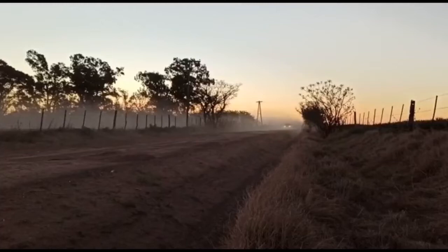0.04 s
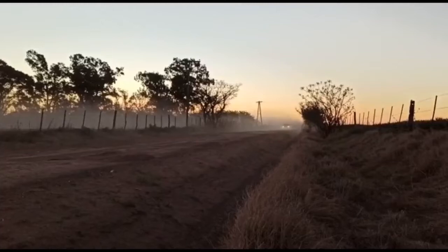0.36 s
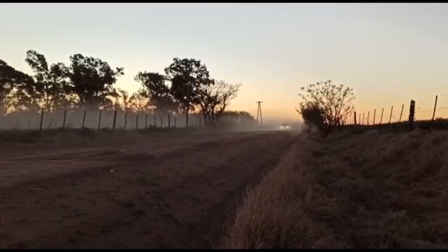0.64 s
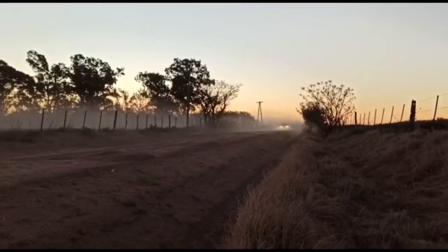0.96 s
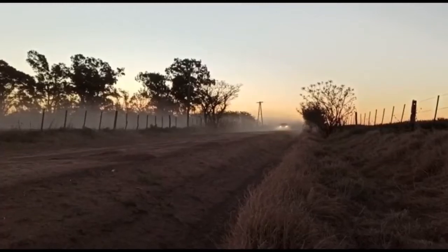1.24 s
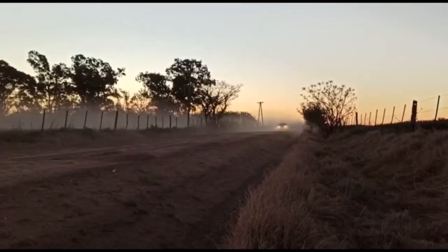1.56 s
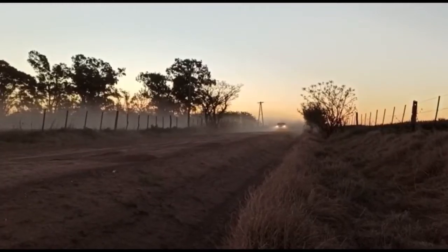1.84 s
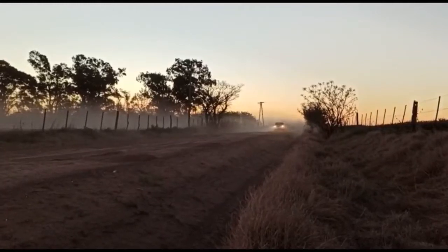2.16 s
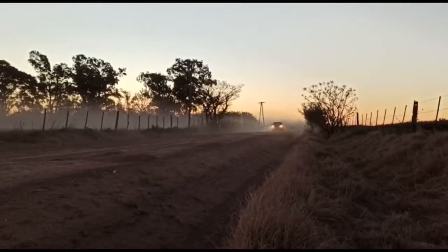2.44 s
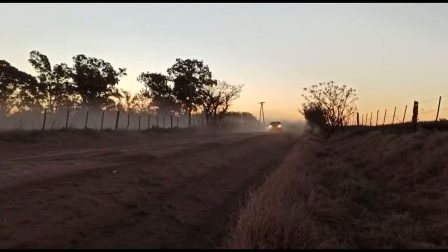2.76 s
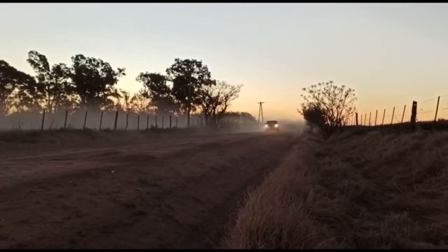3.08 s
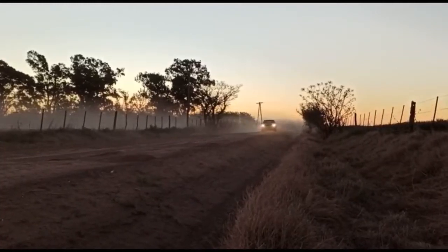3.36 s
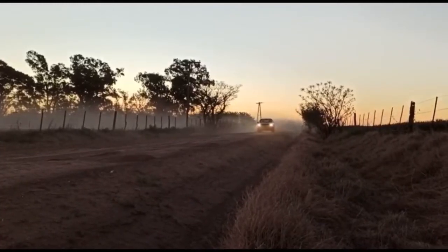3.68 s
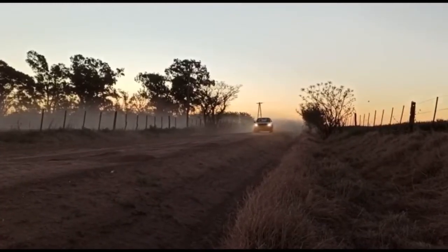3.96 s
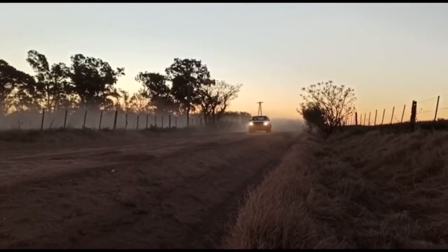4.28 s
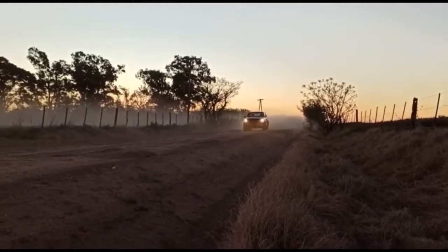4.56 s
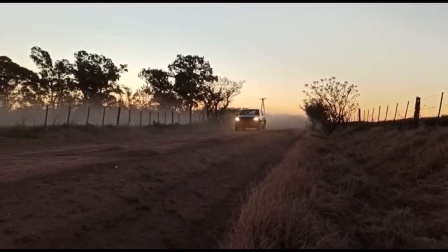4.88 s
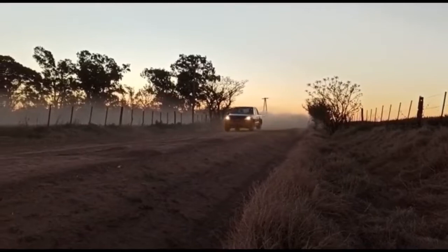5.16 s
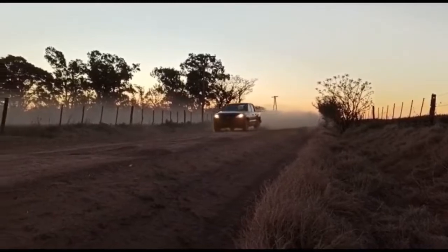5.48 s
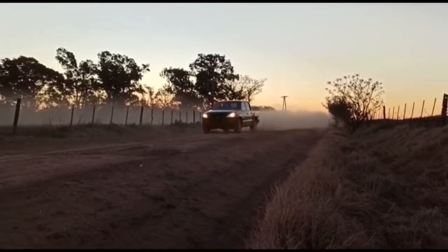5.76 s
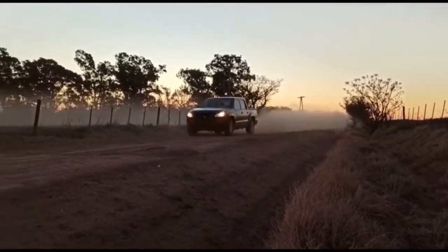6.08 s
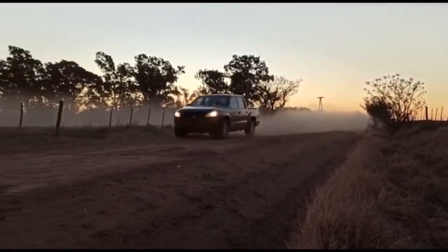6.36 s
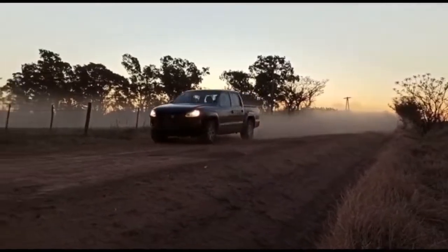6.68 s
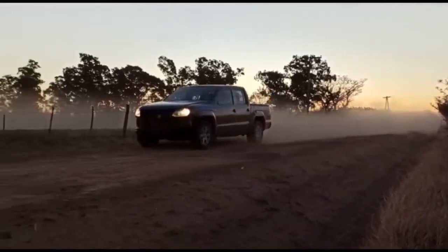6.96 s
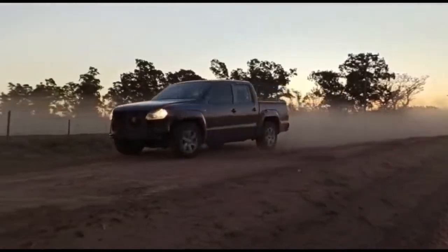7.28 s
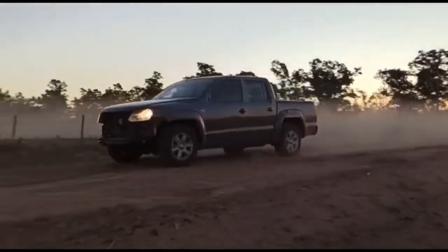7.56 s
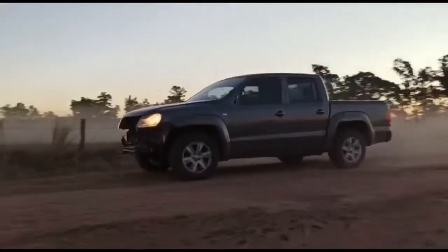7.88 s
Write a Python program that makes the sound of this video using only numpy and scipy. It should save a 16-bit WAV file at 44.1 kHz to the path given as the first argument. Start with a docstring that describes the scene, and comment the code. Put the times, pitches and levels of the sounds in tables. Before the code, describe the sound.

A pickup truck's engine hums in the distance on a dirt road, sinking slowly in pitch over the first four seconds. Dry grass rustles faintly, a cricket chirps softly, and a bird whistles three falling notes between about 1.2 and 2.5 seconds. A faint drivetrain whine sits underneath. From 3 seconds the tyres roar and scrub more loudly on the dirt, with occasional clicks of flicked stones. At about 4.6 seconds the engine revs up once, loudest near 5 seconds, then drops away, burbling and popping until about 6 seconds. A low, throbbing exhaust drone takes over and swells as the truck comes close. From 6.5 seconds a high, whistling hiss rises, along with spraying grit and fine spurts of sand. The sound shifts slightly from left to right, and the drone is still growing as the truck slides past at 8 seconds.

```python
"""A pickup's engine comes up a dirt road at dusk: eight firings a cycle sink in pitch, get one blip of
throttle, then burble and pop on the overrun. A throbbing drone booms through the exhaust pipe and swells
as the truck slides past. Its tyres roar on the dirt and spray grit, stones and sand, and a high,
whistling hiss rises close by. Behind it the dry grass rustles, a cricket chirps and a bird whistles
three times."""
import sys
import numpy as np
from scipy import signal
from scipy.fft import rfft, irfft, next_fast_len
from scipy.io import wavfile
from scipy.ndimage import map_coordinates

SR = 44100
rng = np.random.default_rng(int(sys.argv[2]) if len(sys.argv) > 2 else 0)


def store_wav(level_fs):
    """Save 16-bit WAV to argv[1]."""
    pcm = np.round(np.clip(np.atleast_2d(level_fs), -1, 1) * 32767)
    wavfile.write(sys.argv[1], SR, pcm.T.astype(np.int16))


N = 354123
TIME = np.arange(N) / SR
FFT_SIZE = next_fast_len(N)
BINS = np.maximum(np.arange(FFT_SIZE // 2 + 1) * SR / FFT_SIZE, 1)

# Engine revs. Each row: time in seconds, four-stroke cycles per second.
REVS = [(0.08, 27), (0.5, 25.3), (1.15, 23.4), (1.6, 22.7), (2.0, 20.3), (2.5, 20.4), (3.2, 18.8),
        (3.8, 18.4), (4.4, 14.8), (4.64, 14.8), (4.76, 15.4), (4.86, 18.3), (4.96, 22.8), (5.05, 24.1),
        (5.13, 24.6), (5.25, 23.4), (5.35, 21.8), (5.58, 18.8), (5.7, 16.8), (6.1, 13.4)]
# Overtones of the uneven cylinders. Each row: multiple of the cycle rate, then its gain in dB
# when cruising, at open throttle and on the overrun.
ENGINE_ORDERS = [(4, -9, -19.5, -0.5), (5, -4, 0, 1.5), (9, -5, -4, 7), (10, -7.5, -15, -6.5),
                 (11, -4.5, -0.5, -2), (12, -4, -9, -2.5), (13, -1, -1, -6.5), (14, -5, -7.5, -3),
                 (15, -7, -14, -6.5), (16, -6, -2.5, -7.5), (17, -8, -8, -3), (18, -10, -6.5, -5.5),
                 (21, -10.5, -5, -3), (22, -13.5, -7, -6), (23, -10.5, -5, -14), (24, -12.5, -5.5, -13),
                 (26, -12.5, -5.5, -15.5)]
# Boom at certain revs. Each row: cycles per second, gain in dB of the firing note, and of the sixth order.
BOOM_BY_REVS = [(13.4, -18, -18), (14.5, 0.5, -2), (17.2, 2, 6.5), (17.9, 1, -2), (19.86, -5.5, 8.5),
                (20.47, -5.5, -3), (25.23, 5, -17), (25.84, 0, -18), (27.2, -7.5, -18)]
# Tailpipe colour on the overtones. Each row: frequency in Hz, gain in dB.
TAILPIPE_EQ = [(45, -35), (75, -7.5), (110, 3), (150, -3), (200, 2), (270, 0), (370, 1.5), (440, -8.5),
               (560, -4), (700, -10)]
# Exhaust faders. Each row: time in seconds, base level of engine and burble in dB, rumble level in dB.
EXHAUST_LEVELS = [(0.08, -40.5, -52.5), (0.35, -42, -48), (1.8, -39.5, -52), (2.4, -40, -41),
                  (2.75, -40.5, -46), (3.3, -38, -37.5), (4.2, -38, -46), (4.52, -36, -42),
                  (4.74, -28.5, -47), (4.92, -20.5, -42), (5.08, -23, -35.5), (5.27, -29, -39),
                  (5.42, -27.5, -38.5), (5.75, -26.5, -39), (5.9, -29.5, -40), (6.7, -33.5, -42),
                  (7.25, -30.5, -49), (7.7, -32.5, -39), (8.03, -25, -33)]
# Colours of the gas puffs and the low rumble. Each row: frequency in Hz, relative density in dB.
BURBLE_EQ = [(55, -8.5), (85, -3.5), (120, 8), (160, 8), (200, 9.5), (235, 5.5), (275, 6.5), (320, 1.5),
             (365, 3.5), (430, -5), (560, -12.5), (800, -40.5)]
RUMBLE_EQ = [(20, -14), (50, -19.5), (62, -15.5), (75, 4), (92, 10.5), (120, -1.5), (160, -20.5)]
# The close drone. Each row: time in seconds, pitch of its main note in Hz, drive in dB.
DRONE_PATH = [(5.8, 190.4, -44.5), (6.15, 190, -47), (6.4, 198, -42.5), (6.7, 197, -36.5),
              (6.9, 192.6, -33), (7.1, 188.5, -34), (7.25, 187.3, -30.5), (7.45, 190.4, -28),
              (7.66, 195, -28), (7.8, 200.8, -27), (8.03, 206.1, -25.5)]
# Its partials. Each row: multiple of the throb rate, gain in dB.
DRONE_PARTIALS = [(8, -2.5), (10, -6), (11, 3), (13, 0.5), (15, -7), (16, -5.5), (17, -6), (18, -9.5),
                  (19, 2), (20, -12.5), (21, 0.5), (22, -8), (23, -7), (24, -11.5), (26, -9), (29, -7),
                  (30, -3.5), (31, -9), (32, -8), (34, -9), (35, -11), (39, -13.5), (42, -10)]
# Pipe resonances they slide through. Each row: frequency in Hz, gain in dB.
DRONE_PIPE_EQ = [(70, -8), (98, -11.5), (107, 0.5), (125, -1.5), (145, -6), (170, -1.5), (181, 7.5),
                 (188.5, 14.5), (196, 12), (204, 5), (225, -2.5), (255, -1.5), (280, -1), (295, -7),
                 (340, 1.5), (400, -4.5)]
# Overrun pops and flicked stones. Each row: start in seconds, strength in dB.
POPS = [(4.904, -6), (5.352, -12), (5.362, -15), (5.407, -5), (5.454, -16), (5.664, -23), (5.786, -17)]
STONES = [(0.391, -47), (2.346, -37), (2.407, -35), (3.812, -41), (4.171, -27), (4.302, -27.5),
          (4.702, -22), (5.611, -30), (7.876, -22.5)]
# How each rings. Each row: frequency in Hz, gain in dB, seconds to die away by 60 dB.
POP_MODES = [(124, -10.5, 0.038), (197, -18, 0.019), (358, -7, 0.029), (564, 0, 0.0035),
             (1200, -17.5, 0.011)]
STONE_MODES = [(613, 2.5, 0.029), (800, 0, 0.041), (1110, -2.5, 0.026), (1570, -12, 0.0092),
               (2090, -14.5, 0.0091), (3900, -23, .012)]
# Far drivetrain whine. Each row: time in seconds, pitch in Hz, level in dB.
WHINE_PATH = [(1.5, 775, -65.5), (2.2, 768, -60.5), (3, 755, -57.5), (3.5, 775, -56), (4.4, 770, -59)]
# The truck's approach. Each row: time in seconds, distance in metres.
DISTANCE = [(0, 150), (4, 62), (5, 28), (6, 20.2), (7, 12.7), (8.03, 6.4)]
# Its bearing. Each row: time in seconds, lag of the left side in samples.
LEFT_LAG = [(0, 4), (3, 3.5), (5.7, 2), (6.5, 1.7), (7.25, -0.5), (8, -3)]
# How hard the tyres churn the dirt. Each row: time in seconds, strength in dB.
CHURN = [(0.15, -51), (0.5, -55), (1.6, -57.5), (2.3, -56), (2.8, -51.5), (3.2, -51.5), (3.7, -48.5),
         (4.15, -46.5), (4.32, -42.5), (4.5, -47), (4.9, -38.5), (5.5, -40.5), (6.1, -40.5), (6.45, -42.5),
         (7.0, -41), (7.6, -41), (8.03, -39)]
# Colours of the tyre layers, low to high. Each row: frequency in Hz, relative density in dB.
ROAR_EQ = [(250, 8), (450, 4.5), (560, 2.5), (660, 1.5), (770, 1.5), (950, -6.5), (1300, -28)]
SCRUB_EQ = [(700, -5), (1000, 0), (1150, 2.5), (1400, -2), (1900, -5.5), (2300, -13.5), (2800, -25),
            (4000, -43.5)]
GRIT_EQ = [(2000, 1.5), (2700, -4), (3200, -2.5), (3900, 1.5), (4500, 1), (5000, -7), (5700, -7.5),
           (6500, -2), (8300, -6), (8900, -11)]
DUST_EQ = [(11700, 1), (12300, -5.5), (13300, -3.5), (14300, -1.5), (15700, -4)]
SAND_EQ = [(12300, -15.5), (12900, -1.5), (13400, 1.5), (14000, -8)]
# Spurts of fine sand. Each row: time of the peak in seconds, pitch in Hz, level in dB.
SAND_SPURTS = [(6.32, 13160, -63), (6.78, 13330, -69), (6.94, 13400, -61), (7.28, 13000, -61),
               (7.345, 12770, -54), (7.4, 13120, -50), (7.456, 13400, -48), (7.51, 13100, -50),
               (7.721, 13100, -49), (7.78, 13100, -53), (7.83, 13140, -53)]
# High hiss faders. Each row: time in seconds, hiss level in dB, whistle level in dB.
HISS_LEVELS = [(0, -75, -83), (2.8, -77.5, -79.5), (4, -62, -72), (5, -78, -64), (5.6, -71, -70),
               (6, -63, -60.5), (6.5, -49.5, -53), (6.85, -52.5, -43), (7.22, -46.5, -45),
               (7.6, -43.5, -57.5), (8.03, -49, -52)]
# Colour of that hiss. Each row: frequency in Hz, relative density in dB.
HISS_EQ = [(5900, -13.5), (6300, -3), (6800, 1.5), (7500, 4), (7900, 1), (8600, -10)]
# Bird whistles. Each row: start, length, attack, glide and sinking time in seconds; start pitch,
# knee pitch, sharp drop and final target pitch in Hz; level and fade over the note in dB.
BIRD_NOTES = [(1.17, 0.38, 0.037, .03, 0.083, 4380, 4330, 4, 4180, -70.5, 2),
              (1.658, 0.32, 0.017, 0.104, 0.092, 4380, 5120, 634, 3340, -67, -4.5),
              (2.092, .39, 0.11, 0.064, 0.1, 5920, 5300, 10, 3200, -56, 16)]
# The cricket in the verge. Each row: time in seconds, level in dB.
CRICKET_LEVEL = [(0, -66.5), (2, -71.5), (3.5, -69), (5, -82.5), (8, -83)]
# Colours of the cricket, the grass and the noise floor. Each row: frequency in Hz, relative density in dB.
CRICKET_EQ = [(6200, -8), (6700, -9.5), (7400, 2), (7700, -5.5), (8400, -18.5)]
GRASS_EQ = [(850, 1.5), (1050, 4), (1500, -20), (2300, -9), (2900, -17), (3500, -24.5)]
FLOOR_EQ = [(11700, -3), (13300, 0), (15700, 1.5)]
# Stereo width of the noises. Each row: frequency in Hz, left-right likeness (one is mono).
STEREO_LIKENESS = [(30, 0.91), (80, 0.99), (200, 0.97), (500, 0.97), (1000, 0.86), (2000, 1), (4000, 0.3),
                   (7500, 0.57), (13000, 0.12)]
# Stereo balance. Each row: frequency in Hz, left minus right in dB.
STEREO_BALANCE = [(100, 0), (270, 1.34), (500, 0.6), (1200, -2.5), (2000, -4.5), (3000, 4.5), (4000, -3.5),
                  (5400, 1), (6500, 2.5), (7500, 0.5), (8500, -1), (12000, -2), (14000, -4)]

FIRINGS = 8   # per engine cycle
BLIP_S, BLIP_OPEN_S, BLIP_HOLD_S, BLIP_CLOSE_S = 4.52, 0.14, 0.38, 0.18
OVERRUN_HOLD_S, OVERRUN_EASE_S = 0.23, 0.5
DRONE_ORDER, THROB_PEAK_S = 21, 7.845   # the drone's main note is this multiple of its throb rate
TYPICAL_CHURN_DB, NEAR_M, GRIT_REACH_M = -42, 8.1, 4.7


def engine(cycle_hz, crank, tail_s, fade_s):
    """Eight firings a cycle give the note; unequal cylinders add orders that change with the load."""
    speeds, *booms = np.transpose(BOOM_BY_REVS)
    firing_db, sixth_db = [np.interp(cycle_hz, speeds, db) for db in booms]
    firing_db += exhaust_db(trim_db=-0.3, throttle_db=-4, overrun_db=0)
    sixth_db += exhaust_db(trim_db=-1.5, throttle_db=-21, overrun_db=-7)
    note = from_db(firing_db) * partial(FIRINGS * crank, flutter_db=1.54, flutter_rate=3.7)
    note += from_db(sixth_db) * partial(6 * crank, flutter_db=2.0, flutter_rate=11)
    pulling, braking, overtones = throttle(), overrun(), 0
    for order, cruise_db, open_db, overrun_db in ENGINE_ORDERS:
        db = cruise_db + (open_db - cruise_db) * pulling + (overrun_db - cruise_db) * braking
        db += at_hz(TAILPIPE_EQ, order * cycle_hz)
        overtones += from_db(db) * partial(order * crank, flutter_db=2.0, flutter_rate=6.9)
    overtones *= from_db(exhaust_db(trim_db=-7, throttle_db=1.6, overrun_db=0))
    fade_out = np.clip((REVS[-1][0] + tail_s - TIME) / fade_s, 0, 1)
    return (note + overtones) * fade_out


def throttle():
    """One blip, from zero to one and back: the throttle opens, holds and closes."""
    return np.interp(TIME, BLIP_S + np.cumsum([0, BLIP_OPEN_S, BLIP_HOLD_S, BLIP_CLOSE_S]), [0, 1, 1, 0])


def overrun():
    """One while the closed throttle brakes the engine after the blip, easing off as it slows."""
    closing_s = BLIP_S + BLIP_OPEN_S + BLIP_HOLD_S
    corners_s = closing_s + np.cumsum([0, BLIP_CLOSE_S, OVERRUN_HOLD_S, OVERRUN_EASE_S])
    return np.interp(TIME, corners_s, [0, 1, 1, 0])


def exhaust_db(trim_db, throttle_db, overrun_db):
    """Level of one engine layer: it rides the exhaust fader and shifts with the load."""
    return in_time(EXHAUST_LEVELS)[0] + trim_db + throttle_db * throttle() + overrun_db * overrun()


def drone(waver_per_m, flutter_db_per_m):
    """Orders of one slow throb boom through the pipe, all growing steadier as the truck nears."""
    hz, drive_db = in_time(DRONE_PATH)
    metres, = in_time(DISTANCE)
    throb_hz = hz / DRONE_ORDER
    phase = throb_phase() + phase_of(throb_hz * waver_per_m * metres * drift(12.8))
    tone = 0
    for order, db in DRONE_PARTIALS:
        in_step = DRONE_ORDER - 2 <= order <= DRONE_ORDER   # these three surge together
        offset = 0 if in_step else 2 * np.pi * rng.random()
        pipe_db = at_hz(DRONE_PIPE_EQ, order * throb_hz)
        flutter_db = flutter_db_per_m * metres * drift(6.0)
        tone += from_db(db + pipe_db + flutter_db) * np.cos(order * phase + offset)
    return np.sqrt(2) * from_db(drive_db) * tone * during(DRONE_PATH, fade_s=0.17)


def throb_phase():
    """Phase of the slow throb under the drone, in radians."""
    phase = phase_of(in_time(DRONE_PATH)[0] / DRONE_ORDER)
    return phase - np.interp(THROB_PEAK_S, TIME, phase)


def surges(sharpness):
    """Short surges, two in each cycle of the drone's throb."""
    return (np.cos(throb_phase()) ** 2) ** sharpness * during(DRONE_PATH, fade_s=0.15)


def burble(crank, depth, lump_db, surge_db):
    """Each firing lets out a puff of turbulent gas, some stronger than others."""
    puffs = (1 + depth * np.cos(FIRINGS * crank)) * from_db(lump_db * drift(25))
    db = exhaust_db(trim_db=-1.5, throttle_db=-6, overrun_db=-1.5) + surge_db * surges(sharpness=5)
    return from_db(db) * spread(noise() * puffs, BURBLE_EQ)


def rumble():
    """A bed of deep noise gives the exhaust its weight."""
    return from_db(in_time(EXHAUST_LEVELS)[1]) * spread(noise(), RUMBLE_EQ)


def knocks(events, modes, trim_db):
    """Each pop or stone rings every mode with a strength of its own; little bass is radiated."""
    starts = [round(s * SR) for s, _ in events]
    strength_db = np.array(events)[:, 1] + trim_db
    ringing = np.zeros(N)
    for k, (hz, db, t60) in enumerate(modes):
        clicks = np.zeros(N)
        clicks[starts] = (-1) ** k * from_db(strength_db + db + rng.normal(0, 4.2, len(starts)))
        ringing += ring(clicks, hz, t60)
    return signal.sosfilt(signal.butter(4, 90, "high", fs=SR, output="sos"), ringing)


def gear_whine(waver):
    """A thin, unsteady tone from the far drivetrain."""
    hz, db = in_time(WHINE_PATH)
    tone = partial(phase_of(hz * (1 + waver * drift(20.5))), flutter_db=1.5, flutter_rate=12)
    return from_db(db) * during(WHINE_PATH, fade_s=0.19) * tone


def tyres():
    """Treads roar on packed earth, scrub over loose soil and throw grit and fine dust."""
    ruts = drift(25)   # shake all layers together
    churn_db = in_time(CHURN)[0] - TYPICAL_CHURN_DB

    def fader(far_db, follow, close_db, shake_db, reach_m=GRIT_REACH_M):
        """A layer follows the churn and gains about close_db as the truck comes near."""
        return from_db(far_db + follow * churn_db + close_db * closeness(reach_m) + shake_db * ruts)

    roar = spread(grains(per_s=550, size_db=2.5, share=0.46), ROAR_EQ)
    roar *= fader(far_db=-37.5, follow=0.62, close_db=1.9, shake_db=0.9)
    scrub = spread(grains(per_s=900, size_db=4.5, share=0.37), SCRUB_EQ)
    scrub *= fader(far_db=-43, follow=1.02, close_db=0, shake_db=0.65)
    grit = spread(grains(per_s=2500, size_db=0.5, share=0.48), GRIT_EQ)
    grit *= fader(far_db=-54.5, follow=0.94, close_db=6.5, shake_db=0.84)
    dust = spread(grains(per_s=5000, size_db=6.5, share=0.3), DUST_EQ)
    dust *= fader(far_db=-75.5, follow=0.76, close_db=16.7, shake_db=0.6, reach_m=14)
    return roar + scrub + grit + dust


def closeness(reach_m):
    """Flying soil is heard only over the last metres: one at NEAR_M, dying away with distance."""
    return np.exp(-(in_time(DISTANCE)[0] - NEAR_M) / reach_m)


def sand(sizzle_db, flicker_db, spurt_s, width_hz):
    """Sand sizzles off the sliding tyres, with quick spurts that each have their own pitch."""
    sizzle_gain = from_db(sizzle_db + flicker_db * drift(25)) * closeness(reach_m=7)
    sizzle = spread(grains(per_s=900, size_db=0.5, share=0.5), SAND_EQ)
    spurts = sum(from_db(db) * swell(s, spurt_s) for s, _, db in SAND_SPURTS)
    return sizzle_gain * sizzle + spurts * narrow_noise(in_time(SAND_SPURTS)[0], width_hz)


def high_hiss(pitch_hz, sag_hz, width_hz, frayed_hz, flicker_db, tick_db):
    """A breathy whistle, like air through a turbo, in a wider hiss; both tick with the throb."""
    hiss_db, whistle_db = in_time(HISS_LEVELS)
    sag = swell(at_s=7.15, width_s=0.31)   # the pitch dips once and frays
    centre_hz = pitch_hz - sag_hz * sag
    focused = np.sqrt(1 - sag) * narrow_noise(centre_hz, width_hz)
    frayed = np.sqrt(sag) * narrow_noise(centre_hz, frayed_hz)
    whistle = from_db(whistle_db) * spread(focused + frayed, HISS_EQ)
    hiss = from_db(hiss_db) * spread(grains(per_s=530, size_db=1.5, share=0.32), HISS_EQ)
    return from_db(flicker_db * drift(11) + tick_db * surges(sharpness=60)) * (whistle + hiss)


def bird(waver, echo_db, echo_s, drop_s=0.011, release_s=0.04, edge_db=-25):
    """Pure whistles glide to a knee, may drop sharply, then sink; the trees give one faint echo."""
    song = np.zeros(N)
    for start, length, attack, glide, sink, start_hz, knee_hz, drop_hz, end_hz, db, fade_db in BIRD_NOTES:
        t = TIME - start
        past_knee = np.maximum(t - glide, 0)
        glide_hz = np.interp(t, [0, glide], [start_hz, knee_hz])
        hz = end_hz + (glide_hz - drop_hz - end_hz) * np.exp(-past_knee / sink)
        hz += drop_hz * np.exp(-past_knee / drop_s)
        corners_s = [0, attack, length - release_s, length]
        shape_db = np.interp(t, corners_s, [edge_db, 0, -fade_db, edge_db - fade_db])
        tone = partial(phase_of(hz * (1 + waver * drift(68))), flutter_db=2.0, flutter_rate=25)
        song += from_db(db + shape_db) * (t > 0) * (t < length) * tone
    return song + from_db(echo_db) * np.interp(TIME - echo_s, TIME, song)


def cricket(chirps_per_s, chirp_at_s, trough, uneven_db):
    """Soft rasping chirps of uneven strength in a quick row."""
    pulse = np.cos(np.pi * chirps_per_s * (TIME - chirp_at_s) + 0.2 * drift(4)) ** 2
    chirps = (trough + (1 - trough) * pulse) * from_db(uneven_db * drift(6))
    return from_db(in_time(CRICKET_LEVEL)[0]) * spread(noise() * chirps, CRICKET_EQ)


def grass(level_db):
    """A faint, steady rustle from the dry field."""
    return from_db(level_db) * spread(noise(), GRASS_EQ)


def noise_floor(level_db):
    """A faint, even top-end hiss under everything."""
    return from_db(level_db) * spread(noise(), FLOOR_EQ)


def from_db(db):
    """Decibels to gain."""
    return 10 ** (np.asarray(db) / 20)


def unit_rms(x):
    """Scale to unit rms."""
    return x / np.sqrt(np.mean(x ** 2) + 1e-20)


def in_time(rows):
    """One automation curve for each column after the time, joined by straight lines."""
    seconds, *columns = np.transpose(rows)
    return [np.interp(TIME, seconds, column) for column in columns]


def during(rows, fade_s):
    """One while a table lasts, fading out on either side."""
    return np.clip(1 + np.minimum(TIME - rows[0][0], rows[-1][0] - TIME) / fade_s, 0, 1)


def swell(at_s, width_s):
    """A smooth bell curve of height one."""
    return np.exp(-((TIME - at_s) / width_s) ** 2)


def at_hz(points, hz):
    """Read a curve on a log-frequency axis."""
    point_hz, values = np.transpose(points)
    return np.interp(np.log(hz), np.log(point_hz), values)


def phase_of(hz):
    """Running phase of a frequency curve, in radians."""
    return 2 * np.pi * np.cumsum(hz) / SR


def drift(rate):
    """Smooth random motion of unit rms that changes about rate times a second."""
    hop, settle = 40, 2000
    pole = np.exp(-2 * np.pi * hop * rate / SR)
    white = rng.standard_normal(N // hop + settle + 2)
    slow = signal.lfilter([1], [1, -2 * pole, pole * pole], white)[settle:]
    return np.interp(np.arange(N) / hop, np.arange(len(slow)), unit_rms(slow))


def partial(phase, flutter_db, flutter_rate):
    """A sine whose strength wavers."""
    sine = np.sqrt(2) * np.sin(phase + 2 * np.pi * rng.random())
    return sine * from_db(flutter_db * drift(flutter_rate))


def ring(clicks, hz, t60):
    """A unit click sets a sine of height one ringing."""
    decay, step = from_db(-60 / (t60 * SR)), 2 * np.pi * hz / SR
    return signal.lfilter([0, np.sin(step)], [1, -2 * decay * np.cos(step), decay ** 2], clicks + 1e-18)


def noise():
    """Two unrelated white noises."""
    return rng.standard_normal((2, N))


def narrow_noise(centre_hz, width_hz):
    """A breathy band of noise around a pitch, in two unrelated draws."""
    band = unit_rms(signal.sosfilt(signal.butter(2, width_hz, fs=SR, output="sos"), noise()))
    return np.sqrt(2) * band * np.cos(phase_of(centre_hz))


def grains(per_s, size_db, share):
    """Random clicks of uneven size on a bed of noise; share is their part of the power."""
    sizes = from_db(size_db * np.minimum(rng.exponential(1, N), 4))
    clicks = unit_rms((rng.random(N) < per_s / SR) * sizes * np.sign(noise()))
    return np.sqrt(share) * clicks + np.sqrt(1 - share) * noise()


def colour(x, gain):
    """Apply a gain per frequency."""
    return irfft(rfft(x, FFT_SIZE) * gain, FFT_SIZE)[..., :N]


def spread(pair, eq):
    """Two unrelated signals become coloured stereo, centred in the bass and wide in the treble."""
    octaves_outside = np.abs(np.log2(BINS / np.clip(BINS, eq[0][0], eq[-1][0])))
    gain = from_db(at_hz(eq, BINS) - 400 * octaves_outside)   # steep cut past the curve's ends
    alike = np.clip(at_hz(STEREO_LIKENESS, BINS), 0, 1)
    mid = colour(pair[0], gain)
    side = colour(pair[1], gain * np.sqrt((1 - alike) / (1 + alike)))
    return (mid + side * [[1], [-1]]) / np.std(mid)


def scene():
    """The truck crosses the stereo image in front of the quiet field."""
    cycle_hz, = in_time(REVS)
    crank = phase_of(cycle_hz * (1 + 0.0018 * drift(19.6)))
    motor = engine(cycle_hz, crank, tail_s=0.11, fade_s=0.69) + gear_whine(waver=0.0085)
    boom = drone(waver_per_m=0.0002953, flutter_db_per_m=0.1032)
    gas = burble(crank, depth=0.76, lump_db=1.9, surge_db=1.5) + rumble()
    hits = knocks(POPS, POP_MODES, trim_db=-3.5) + knocks(STONES, STONE_MODES, trim_db=-5.0)
    dirt = tyres() + sand(sizzle_db=-60, flicker_db=2.5, spurt_s=0.018, width_hz=260)
    hiss = high_hiss(pitch_hz=7570, sag_hz=482, width_hz=140, frayed_hz=450, flicker_db=1.5, tick_db=6)
    truck = motor + boom + gas + hits + dirt + hiss
    truck[0] = map_coordinates(truck[0], [np.arange(N) - in_time(LEFT_LAG)[0]], order=5)   # pan by delay
    field = grass(level_db=-61.5) + cricket(chirps_per_s=11, chirp_at_s=1.095, trough=0.4, uneven_db=1.5)
    field += bird(waver=0.005, echo_db=-20, echo_s=0.035)
    balance = from_db(at_hz(STEREO_BALANCE, BINS) * [[0.5], [-0.5]])
    return colour(truck + field, balance) + noise_floor(level_db=-80.5)


def record(dry):
    """The mix snaps in after a moment of silence, with the very top cut off."""
    start_s, fade_s, cutoff_hz = 0.072, 0.0007, 15800
    high_cut = 1 / (1 + (BINS / cutoff_hz) ** 300)
    return colour(dry, high_cut) * np.clip((TIME - start_s) / fade_s, 0, 1)


dry = scene()
out = record(dry)
store_wav(out)
```